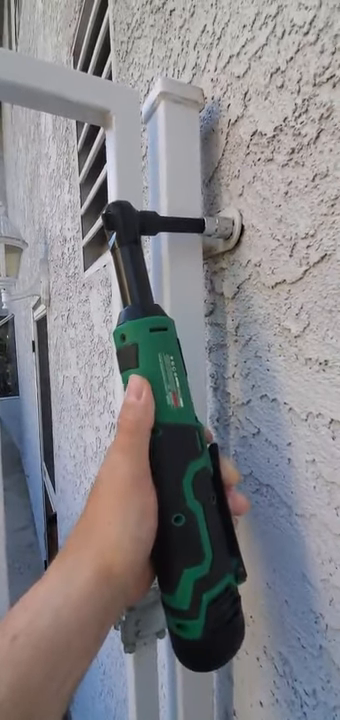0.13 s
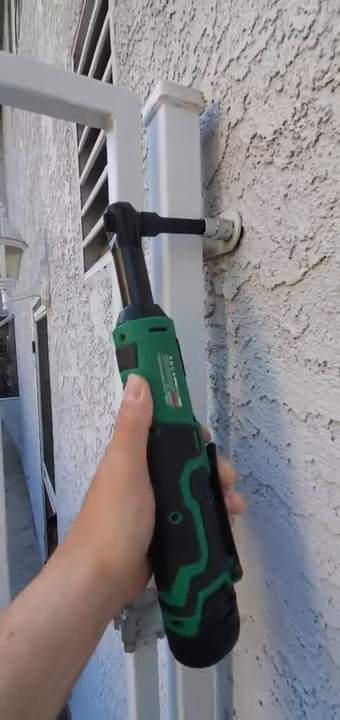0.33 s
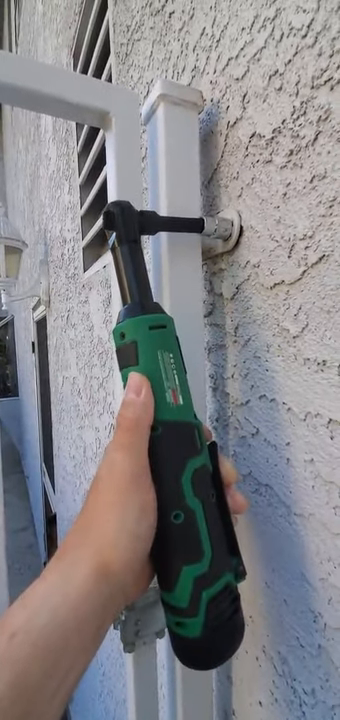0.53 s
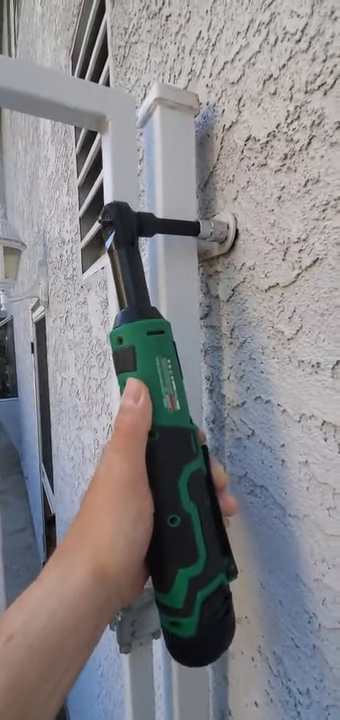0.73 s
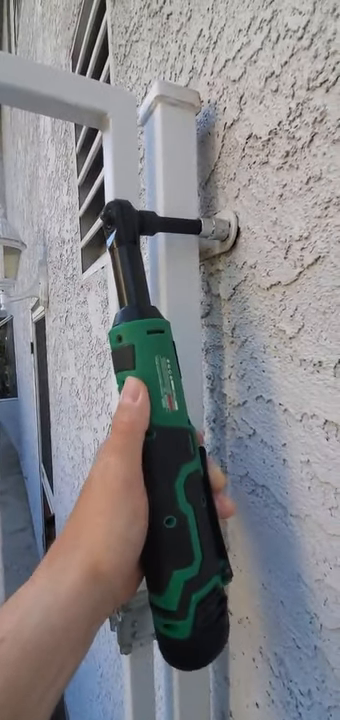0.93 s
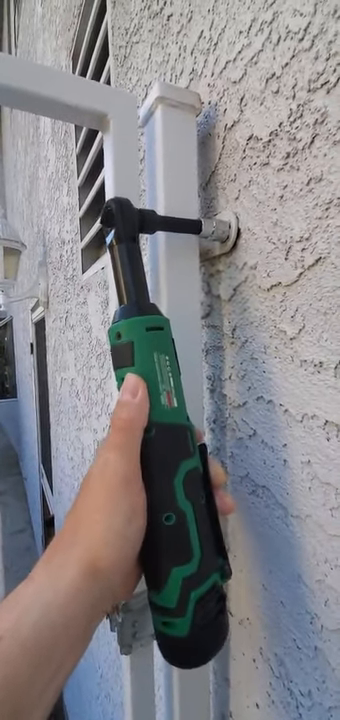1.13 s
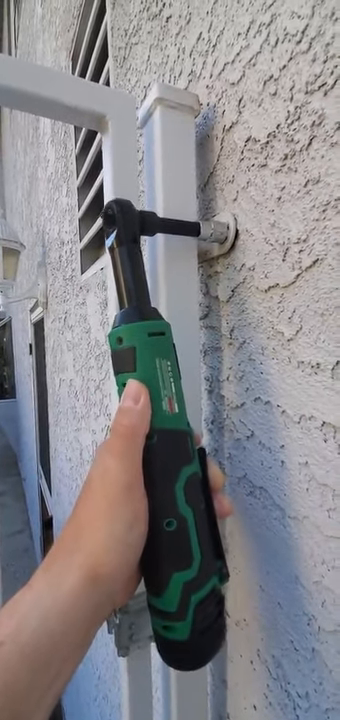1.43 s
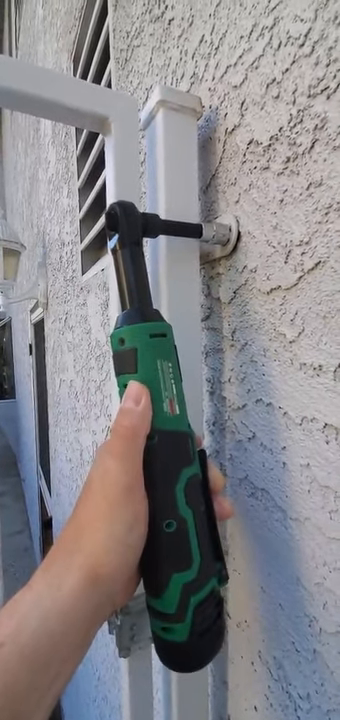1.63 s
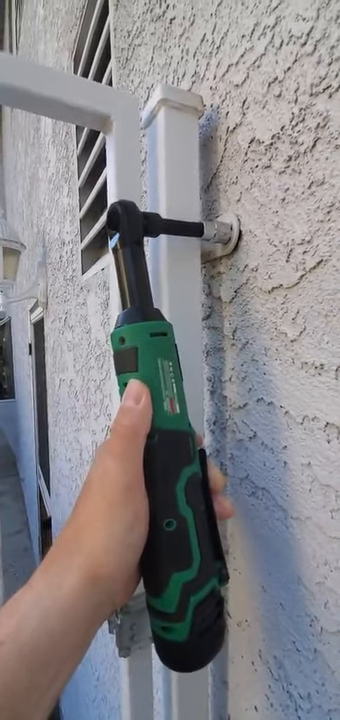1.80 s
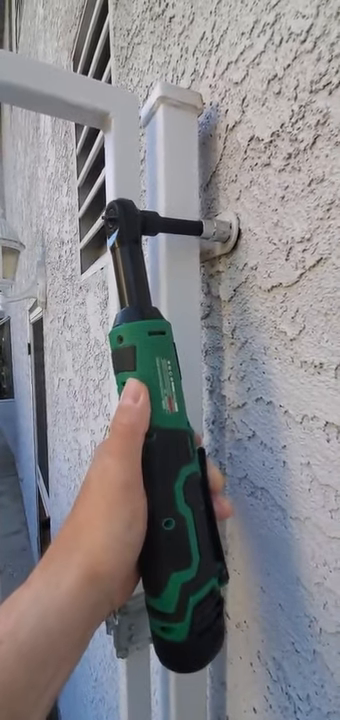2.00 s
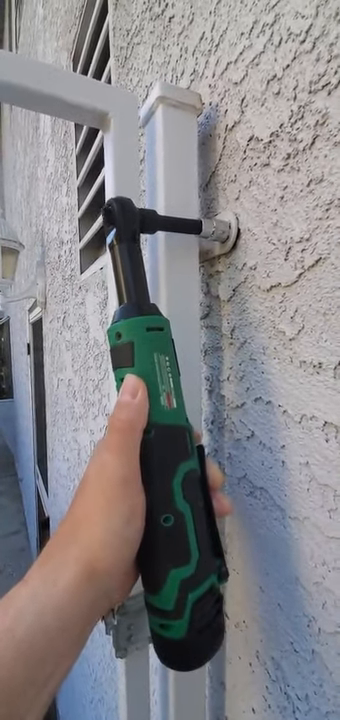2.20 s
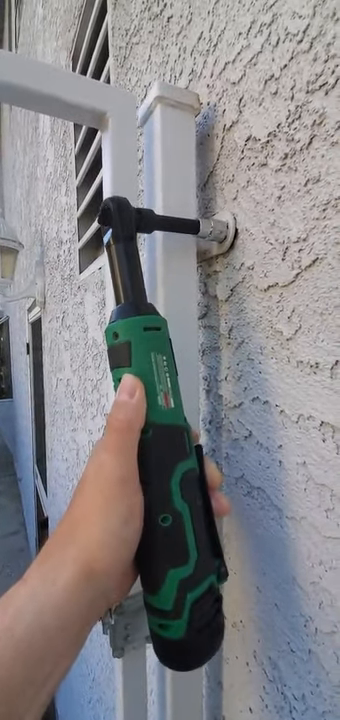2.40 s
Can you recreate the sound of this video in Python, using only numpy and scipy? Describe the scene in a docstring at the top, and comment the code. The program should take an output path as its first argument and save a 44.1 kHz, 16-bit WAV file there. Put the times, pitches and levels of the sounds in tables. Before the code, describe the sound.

Close stereo microphone, dry outdoor spot by a rough wall: an electric ratchet whines, clacks and rattles against a metal gate, races harshly, slows to crisp even pawl clicks, then clicks faster and louder to the end.

```python
"""A motor whines over a low rumble: a cordless ratchet is driving a bolt through a metal gate post into a stucco wall.
As the trigger is eased in, the whine steps up and the head takes a few slow, knocking strokes. Then the gears race
and howl, slow to an even clicking of the pawl and pick up again. The tool body thrums under it, with short echoes.
The whine is made of sine tones; gears, pawl and knocks are shaped noise; filtered noise makes the thrum and rumble."""
import sys
import numpy as np
from scipy import signal
from scipy.fft import rfft, irfft
from scipy.io import wavfile

SR = 44100
rng = np.random.default_rng(int(sys.argv[2]) if len(sys.argv) > 2 else 0)


def master_out(mix):
    """Clip the mix to full scale and print it as 16-bit PCM to the path in sys.argv[1]."""
    frames = np.transpose(np.atleast_2d(mix))
    ceiling = np.clip(frames, -1, 1)
    pcm = np.round(ceiling * 32767).astype(np.int16)
    wavfile.write(sys.argv[1], SR, pcm)


N = 112455
T = np.arange(N) / SR  # time of every sample [s]

# how the tool and gate pass on each pitch, as relative levels: (frequency [Hz], left [dB], right [dB])
TOOL_COLOUR = [(194, -7.5, -24.5), (500, -12, -15.5), (990, -6, -15), (1350, -7.5, -14), (1660, -18, -13),
               (1713, -7, -16.5), (2540, -7.5, -12), (2606, -12.5, -17), (3070, -4.5, -10),
               (3200, -18.5, -13.5), (3380, -5.5, -9.5), (4650, -4.5, -7), (5200, -10, -2),
               (5060, -8, -20.5), (6000, -5.5, -13.5), (6900, -5, -25), (7330, -22, -21), (7360, -9, -34),
               (9640, -11, -16.5), (9300, -16.5, -22.5), (11090, -8, -15.5), (11820, -4.5, -7),
               (12530, -4, -18), (13150, -0.5, -4), (14960, -3.5, -30), (15800, -1, -16)]
# slow strokes taking up the load: (time [s], clack level [dB], rattle level [dB]), before filtering
STROKES = [(0.271, -15, -19), (.349, -12, -17.5), (0.4305, -15.5, -17.5), (0.509, -15.5, -18),
           (0.5904, -15, -19), (0.642, -6.5, -16.5)]
BASS_LIKENESS, LOW_LIKENESS, MID_LIKENESS = .97, .75, .2  # share of noise power common to both sides
CLACK_RISE_S, SNAP_RISE_S = .0017, .0005
RATTLE_RISE_S, RATTLE_LAG_S = .0034, .0031


def from_db(db):
    """Turn decibels into a gain."""
    return 10 ** (np.asarray(db) / 20)


def rms_one(x):
    """Scale a signal to an average power of 1."""
    return x / np.sqrt(np.mean(x ** 2) + 1e-20)


def in_time(rows):
    """Draw each column of a (time, value, ...) table as a curve with one value per sample."""
    s, *columns = np.transpose(rows)
    return [np.interp(T, s, column) for column in columns]


def butter(x, hz, kind, order=2):
    """Keep the low, high or band part of a sound with a Butterworth filter."""
    hz = np.clip(hz, 10, SR / 2 - 100)
    return signal.sosfilt(signal.butter(order, hz, kind, fs=SR, output="sos"), x)


def drift(rate):
    """Wander smoothly at random, up to the given rate in Hz, with an RMS of 1."""
    return rms_one(butter(rng.standard_normal(N), rate, "low"))


def noise(likeness=0):
    """Make stereo white noise whose two sides share a part."""
    share = np.clip(likeness, 0, 1)
    common = np.sqrt(share) * rng.standard_normal(N)
    return common + np.sqrt(1 - share) * rng.standard_normal((2, N))


def coloured(x, points, size=4096):
    """Filter through (Hz, dB) or (Hz, left dB, right dB) points with rounded corners, keeping white noise's power."""
    hz, *sides = np.transpose(points)
    grid = np.log(np.maximum(np.arange(size // 2 + 1) * SR / size, 1))
    # averaging over about 2 % of the frequency to either side rounds the corners
    near = grid + .02 * np.linspace(-1, 1, 10)[:, None]
    curves = [np.interp(near, np.log(hz), db).mean(axis=0) for db in sides]
    # folding the cepstrum makes the filter respond only after its input
    cepstrum = irfft(np.log(from_db(curves)))
    cepstrum[:, 1:size // 2] *= 2
    cepstrum[:, size // 2 + 1:] = 0
    response = irfft(np.exp(rfft(cepstrum)))
    response = response / np.sqrt(np.sum(response ** 2) / len(sides))
    return signal.fftconvolve(x, response, axes=1)[:, :N]


def burst(s, rise, decay):
    """Shape a level that swells to 1 at time s and dies away."""
    distance = np.maximum((s - T) / rise, (T - s) / decay)
    return np.exp(-np.minimum(distance, 40))


def delayed(side, ms):
    """Shift one side later by whole samples."""
    return np.pad(side, (round(ms * SR / 1000), 0))[:N]


def grinding(likeness=0, grain_db=1):
    """Rub steel teeth together: noise broken into fast, uneven grains."""
    grains_hz = 670
    hiss = noise(likeness)
    grain = np.minimum(drift(grains_hz), 2)
    return rms_one(hiss * from_db(grain_db * grain))


def motor_whine():
    """The switched drive current makes the windings sing, in steps with the trigger, wavering once under load."""
    # the drive whine: (time [s], pitch [Hz], level [dB]), before the waver and the partials' own levels
    whine = [(0, 4344, -45.5), (.112, 4330, -47.5), (.119, 4693, -41), (.232, 4733, -37.5),
             (.245, 4735, -46.5), (.31, 4735, -40), (.33, 4700, -47), (.56, 4730, -49), (.63, 4736, -60)]
    # (multiple of the pitch, left [dB], right [dB], extra growth with the drive level [dB per dB])
    partials = [(1, -2, 1, 0), (2, -19, -28, -.4), (3, -12, -23, 3)]
    waver_db, waver_hz, loaded_s = 5.5, 51, .2
    full_db = -39  # drive level at which the extra growth is zero
    hz, db = in_time(whine)
    phase = 2 * np.pi * np.cumsum(hz) / SR
    level = from_db(db + waver_db * drift(waver_hz) * (T > loaded_s))
    tone = 0
    for multiple, left, right, growth in partials:
        gain = from_db(np.array([[left], [right]]) + growth * (db - full_db))
        tone = tone + gain * np.sin(multiple * phase)
    return level * tone


def bass(curve, colour, db):
    """Shake a low resonance at random, following its level curve shifted by db."""
    return from_db(in_time(curve)[0] + db) * rms_one(coloured(noise(BASS_LIKENESS), colour))


def rumble():
    """A low resonance, strongest near 68 Hz, is shaken at random."""
    # (time [s], level [dB]), before a shift of -0.5 dB
    rumble_levels = [(0, -50.5), (.5, -54), (.64, -48), (.8, -51.5), (1.05, -48), (1.2, -55), (1.6, -55.5),
                     (1.75, -61.5), (2.12, -66), (2.2, -50), (2.55, -50)]
    # relative strength of each pitch: (frequency [Hz], level [dB])
    rumble_colour = [(15, -65), (45, -4), (56, -6.5), (68, 7.5), (82, -8.5), (103, 1), (135, -16),
                     (300, -32), (8000, -63)]
    return bass(rumble_levels, rumble_colour, -.5)


def steel(x):
    """The steel of the head and gate rings in many close, narrow resonances, added to the sound that sets them off."""
    count, low_hz, high_hz, width_hz, ring_db = 48, 3100, 6700, 28, -5.5
    pitches = np.linspace(low_hz, high_hz, count)
    spacing = pitches[1] - pitches[0]
    pitches = pitches + spacing * rng.uniform(-.3, .39, count)
    ring = 0
    for hz in pitches:
        sign = rng.choice([-1, 1])
        ring = ring + sign * signal.lfilter(*signal.iirpeak(hz, hz / width_hz, fs=SR), x)
    strength = np.std(butter(x, (low_hz, high_hz), "band"))
    return x + from_db(ring_db) * strength * rms_one(ring)


def gears():
    """The gear train grinds in three registers that pulse with each motor turn; driven hard, the gearbox howls."""
    # the whirr: (time [s], low rattle [dB], mid whirr [dB], treble [dB]), before the flutter and ringing
    whirr = [(.105, -89, -76, -77), (.16, -68, -61, -60), (.19, -47, -44, -63), (0.229, -38.5, -42.5, -39),
             (.25, -53, -44, -46), (.575, -52.5, -50, -47), (.62, -71, -42, -49), (0.667, -34.5, -26, -21),
             (.75, -43, -29, -23), (.82, -45, -29.5, -22), (.86, -38.5, -28.5, -19), (1.0, -41, -30, -23),
             (1.06, -35, -29, -21.5), (1.118, -42.5, -33.5, -26), (1.3, -43.5, -38, -31),
             (1.41, -49.5, -44, -38.5), (1.48, -48.5, -44.5, -43.5), (1.83, -49, -45.5, -48.5),
             (1.87, -42, -38, -34.5), (2.06, -44.5, -36.5, -34), (2.19, -42, -39, -34.5),
             (2.32, -43.5, -37, -33), (2.55, -39.5, -32, -28.5)]
    # the three registers: (lowest [Hz], highest [Hz])
    registers = [(230, 2300), (2300, 10000), (10000, 17000)]
    # speed of the drive: (time [s], head strokes [per s])
    speed = [(.62, 12.6), (.68, 65), (1.0, 73), (1.15, 42), (1.45, 23.5), (1.83, 22.7), (1.9, 35),
             (2.55, 36)]
    turns_per_stroke, pulse_db = 4, .5
    flutter_db, flutter_hz = 1.85, 79
    howl_hz, howl_width_hz, howl_right_db = 6270, 1060, -14  # the right side is that much weaker
    # the howl has this level when the mid whirr is at full_db, and grows in dB per dB of whirr
    howl_db, howl_growth, full_db = -26.5, 4.5, -26

    turns = turns_per_stroke * np.cumsum(in_time(speed)[0]) / SR
    pulse = pulse_db * np.cos(2 * np.pi * turns)
    flutter = rms_one(from_db(flutter_db * drift(flutter_hz) + pulse))
    levels = in_time(whirr)
    grind = 0
    for band, db, likeness in zip(registers, levels, (LOW_LIKENESS, MID_LIKENESS, 0)):
        register = butter(coloured(grinding(likeness), TOOL_COLOUR), band, "band", order=4)
        grind = grind + from_db(db) * rms_one(register)
    howl_band = (howl_hz - howl_width_hz / 2, howl_hz + howl_width_hz / 2)
    howl = rms_one(butter(noise(), howl_band, "band"))
    howl = howl * from_db(howl_db + howl_growth * (levels[1] - full_db))
    howl = howl * from_db([[0], [howl_right_db]])
    return steel(flutter * (grind + howl))


def trigger():
    """A faint plastic tick, a short burst of noise, as the trigger goes in further."""
    # relative strength of each pitch: (frequency [Hz], level [dB])
    tick_colour = [(300, -26), (620, 10), (950, -25), (5000, 0), (12000, -14)]
    tick_s, tick_db, decay_s = .114, -49.5, .0048
    return from_db(tick_db) * burst(tick_s, SNAP_RISE_S, decay_s) * coloured(noise(LOW_LIKENESS), tick_colour)


def thrum():
    """The tool body's low resonance, strongest near 174 Hz, is shaken at random."""
    # (time [s], level [dB]), before a shift of 3.5 dB
    thrum_levels = [(.12, -72), (.26, -46.5), (.55, -54.5), (.68, -43.5), (.82, -57), (1.07, -51),
                    (1.25, -52.5), (1.58, -56.5), (1.78, -61), (2.0, -46), (2.1, -52.5), (2.55, -49)]
    # relative strength of each pitch: (frequency [Hz], level [dB])
    thrum_colour = [(60, -58), (125, -12), (152, -7.5), (174, 2.5), (192, 0.5), (222, -13.5), (310, -24.5),
                    (3000, -71)]
    return bass(thrum_levels, thrum_colour, 3.5)


def pawl():
    """The pawl makes bright noise as it scrapes over the teeth, and sharp, fuller bursts as it snaps into them."""
    # scrapes over a tooth: (time [s], level [dB] before scrape_db and filtering, swell and fade scale [ms])
    scrape_rows = [(0.242, -15.5, 2), (0.25, -22, 7.1), (.323, -16.5, 3), (0.4006, -20.5, 3.8),
                   (0.4811, -22.5, 3.6), (0.564, -22, 3.2), (.629, -33, 13), (1.244, -24, 1.8),
                   (1.2827, -16, 0.96), (1.315, -28, 2.6), (1.336, -17, 2.5), (1.418, -19.5, 6.2),
                   (1.45, -23, 2.5), (1.494, -18.5, 3.1), (1.5363, -17.5, 2.5), (1.581, -20.5, 2.9),
                   (1.623, -28.5, 6.8), (1.6641, -17.5, 3), (1.7073, -20.5, 3.3), (1.751, -17, 1.45),
                   (1.7954, -17.5, 3.5), (1.8406, -20, 2.7), (1.874, -18, 2.7), (1.903, -28.5, 8),
                   (1.934, -21, 2.3), (1.961, -19.5, 2.8), (1.986, -25, 7.1), (2.016, -17.5, 2.5),
                   (2.046, -22, 7.6), (2.073, -21.5, 4.3), (2.099, -24, 3.4), (2.129, -19.5, 4.3),
                   (2.2157, -19, 5.7), (2.247, -26, 7.3), (2.2734, -19.5, 4.8), (2.303, -17.5, 5.9),
                   (2.363, -23.5, 3.1), (2.391, -22, 4.5), (2.419, -26.5, 3.7), (2.448, -24, 4.3),
                   (2.475, -19.5, 3.1), (2.501, -21, 7.1), (2.526, -21, 5)]
    # snaps into a tooth: (time [s], level [dB]), before snap_db and filtering
    snap_rows = [(.700, -18), (0.7164, -16), (.731, -21), (.761, -22), (0.774, -17), (0.84, -21),
                 (.858, -17.5), (0.87, -25), (0.927, -20), (0.942, -19), (.996, -26), (1.0085, -16),
                 (1.025, -17), (1.041, -19), (1.055, -29), (1.073, -14.5), (1.131, -25), (1.1504, -19),
                 (1.176, -19), (1.1987, -28), (1.224, -24), (1.283, -21), (1.35, -22), (1.386, -16),
                 (1.409, -24), (1.4698, -23.5), (1.511, -25.5), (1.555, -24), (1.598, -25), (1.623, -21.5),
                 (1.641, -31), (1.727, -33), (1.768, -29), (1.8146, -26), (1.855, -23), (1.91, -18),
                 (2.014, -34), (2.042, -27), (2.083, -18), (2.111, -20), (2.137, -17.5), (2.165, -16.5),
                 (2.224, -18.5), (2.254, -18), (2.283, -14), (2.311, -34), (2.341, -16.5), (2.4, -15.5),
                 (2.429, -20), (2.458, -18)]
    scrape_db, scrape_edge_hz, scrape_body_db, scrape_grain_db = 9.5, 10200, -13.5, 2.8
    snap_db, snap_decay_s, snap_dull_hz = 5.5, .0011, 15200
    lowest_hz = 3230

    scrape_level = sum(from_db(db + scrape_db) / (1 + ((T - s) * 1000 / ms) ** 2) ** 2.5
                       for s, db, ms in scrape_rows)
    scrapes = grinding(grain_db=scrape_grain_db) * scrape_level
    edge = butter(scrapes, scrape_edge_hz, "high", order=4)
    body = from_db(scrape_body_db) * butter(scrapes, lowest_hz, "high", order=4)

    snap_level = sum(from_db(db + snap_db) * burst(s, SNAP_RISE_S, snap_decay_s) for s, db in snap_rows)
    snaps = butter(noise(MID_LIKENESS) * snap_level, snap_dull_hz, "low", order=1)
    snaps = butter(snaps, lowest_hz, "high")
    return coloured(edge + body + snaps, TOOL_COLOUR)


def knocks():
    """Each slow stroke clacks against the bolt and leaves the gate rattling, both as bursts of noise."""
    clack_decay_s, clack_edge_hz = .0013, 2600
    rattle_decay_s, rattle_low_hz, rattle_high_hz = .025, 207, 2240
    clack_level = sum(from_db(db) * burst(s, CLACK_RISE_S, clack_decay_s) for s, db, _ in STROKES)
    clacks = butter(grinding() * clack_level, clack_edge_hz, "high", order=1)
    rattle_level = sum(from_db(db) * burst(s + RATTLE_LAG_S, RATTLE_RISE_S, rattle_decay_s)
                       for s, _, db in STROKES)
    rattles = butter(noise(LOW_LIKENESS) * rattle_level, rattle_high_hz, "low", order=1)
    rattles = butter(rattles, rattle_low_hz, "high")
    return coloured(clacks + rattles, TOOL_COLOUR)


def thuds():
    """Each knock also sets the body's low resonance thrumming."""
    thud_db, decay_s, band_hz = -41, .028, (150, 270)
    swell = sum(burst(s + RATTLE_LAG_S, RATTLE_RISE_S, decay_s) for s, _, _ in STROKES)
    return from_db(thud_db) * swell * rms_one(butter(noise(BASS_LIKENESS), band_hz, "band"))


def squeaks():
    """Short, falling chirps, roughened by a trembling pitch, as the bolt slips under load."""
    # (time [s], level [dB])
    chirps = [(.512, -32), (.595, -32)]
    middle_hz, fall_hz_per_s, decay_s = 6150, 300000, .0091
    jitter_hz, jitter_rate_hz = 450, 500
    jitter = jitter_hz * drift(jitter_rate_hz)
    out = 0
    for s, db in chirps:
        falling = middle_hz - fall_hz_per_s * (T - s)
        hz = np.clip(falling, middle_hz / 2, 2 * middle_hz) + jitter
        out = out + from_db(db) * burst(s, CLACK_RISE_S, decay_s) * np.sin(2 * np.pi * np.cumsum(hz) / SR)
    return out


def wall(x):
    """Two close reflections on each side and a very short outdoor tail, dulled by the rough stucco."""
    # off post, wall and ground: (left delay [ms], right delay [ms], level [dB])
    reflections = [(2.517, 8.6, -21), (21.54, 10.6, -11)]
    tail_db, tail_decay_s, dull_hz = -10, .008, 7000
    out = x.copy()
    dull = butter(x, dull_hz, "low")
    for *delays, db in reflections:
        out += from_db(db) * np.array([delayed(side, ms) for ms, side in zip(delays, dull)])
    tail = (noise() * np.exp(-T / tail_decay_s))[:, :SR // 4]
    tail = tail / np.sqrt(np.sum(tail ** 2) / 2)
    softer = butter(x, dull_hz, "low", order=1)
    return out + from_db(tail_db) * signal.fftconvolve(softer, tail, axes=1)[:, :N]


def microphones(x):
    """The sound reaches the right microphone a little later."""
    right_lag_ms = .32
    return np.array([x[0], delayed(x[1], right_lag_ms)])


def scene():
    """The ratchet against the wall, with its whine and thuds, over its thrum and the rumble."""
    tool = microphones(wall(gears() + trigger() + pawl() + knocks() + squeaks()))
    return tool + motor_whine() + rumble() + thrum() + thuds()


def record(dry):
    """Round off the highest peaks and cut the top of the treble."""
    peak, cutoff_hz = .85, 15800
    rounded = peak * np.tanh(dry / peak)
    return signal.sosfilt(signal.ellip(12, .1, 80, cutoff_hz, fs=SR, output="sos"), rounded)


dry = scene()
out = record(dry)
master_out(out)
```